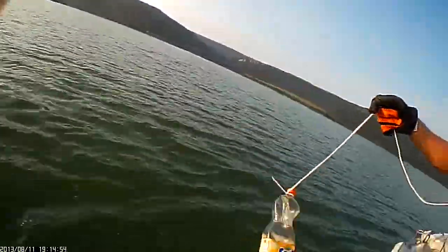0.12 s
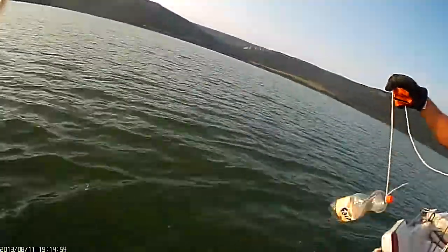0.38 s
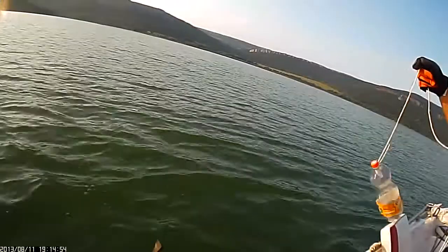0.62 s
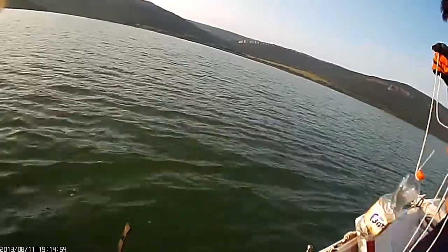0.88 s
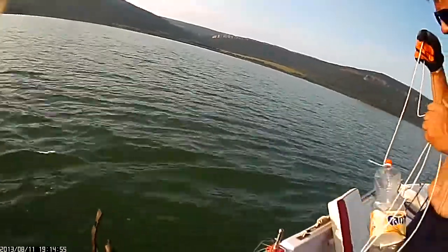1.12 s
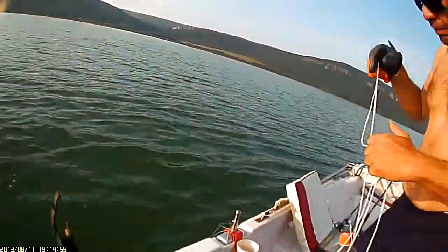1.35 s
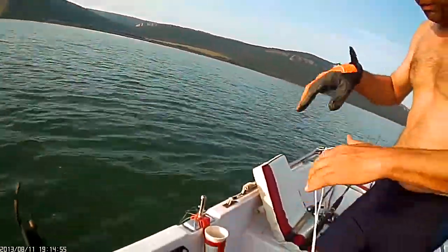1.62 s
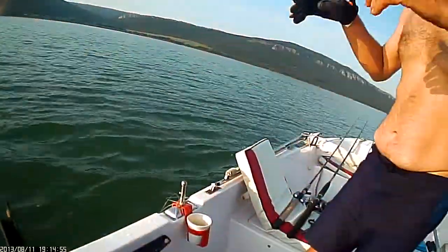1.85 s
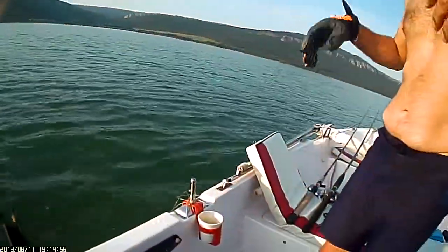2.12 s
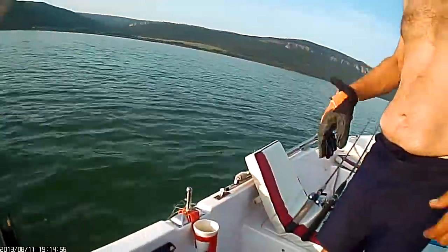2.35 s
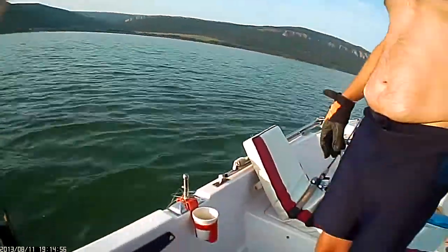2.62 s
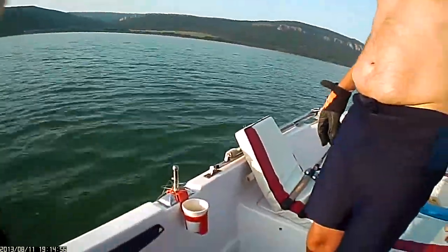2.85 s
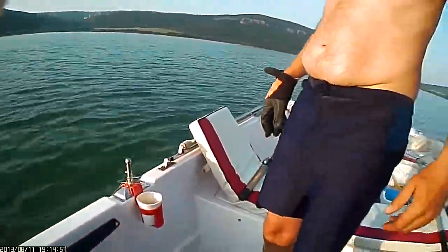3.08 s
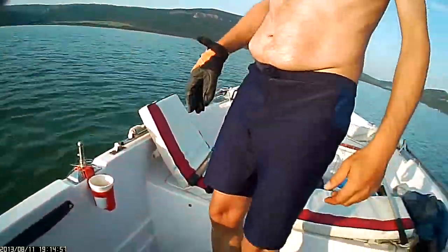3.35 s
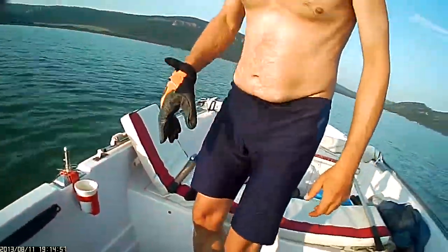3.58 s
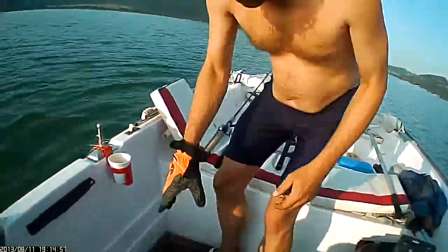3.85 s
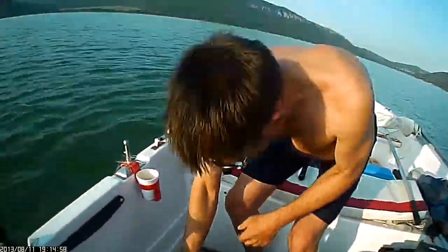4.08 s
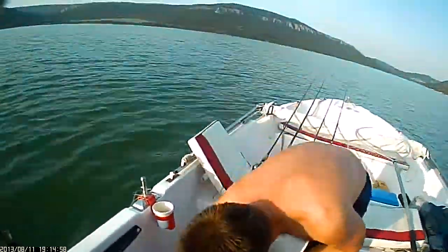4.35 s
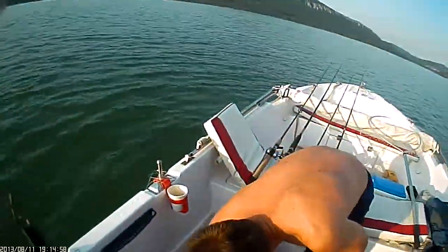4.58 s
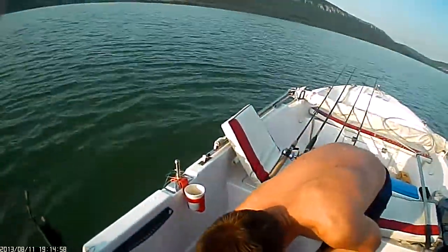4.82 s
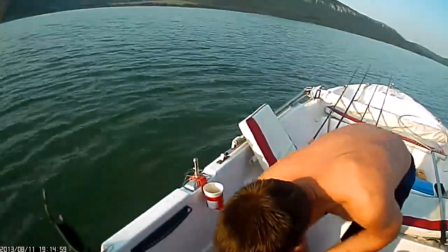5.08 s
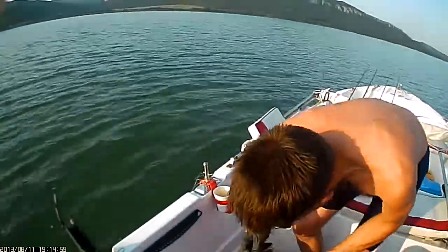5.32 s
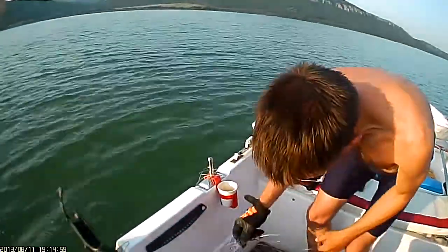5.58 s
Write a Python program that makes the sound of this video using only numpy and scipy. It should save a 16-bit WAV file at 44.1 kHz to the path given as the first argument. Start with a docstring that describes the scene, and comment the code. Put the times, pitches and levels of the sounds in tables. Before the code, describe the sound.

Muffled boat motor puffs steadily while a wet float is lifted, drops with a hollow bang, bounces, and gear knocks and scrapes.

```python
"""An idling outboard throbs and puffs once a turn on a lake, heard from inside a sealed plastic case.
A float comes dripping out of the water with gulps of air, drops on the deck and bounces; gear knocks and scrapes.
The throb is a sum of multiples of the turn rate, puffs and rattle are gated noise, and blows ring hull modes.
Narrow high rings and a loose metal fitting are noise-driven modes, gulps are short sliding tones.
Underneath, banded noise swells as wind, wash, handling rubs and spray, and the microphone hisses steadily."""
import sys
import numpy as np
from scipy import signal
from scipy.fft import rfft, irfft
from scipy.io import wavfile
from scipy.ndimage import uniform_filter1d

SR = 44100
rng = np.random.default_rng(int(sys.argv[2]) if len(sys.argv) > 2 else 0)


def wrap_up_sound(samples):
    """Save the sound to the file named by the first command line argument, as 16-bit audio."""
    columns = np.atleast_2d(samples).T
    # keep every value between -1 and 1, then stretch to whole-number steps
    tamed = np.clip(columns, -1, 1)
    steps = np.round(tamed * 32767).astype(np.int16)
    wavfile.write(sys.argv[1], SR, steps)


def undo_db(level):
    """Turn decibels back into plain size, where 20 dB means ten times bigger."""
    steps = np.asarray(level, float) / 20
    return 10 ** steps


N = 251370
T = np.arange(N) / SR
RISE_S = 0.001247  # build-up of a contact

# What passes the sealed case: (frequency [Hz], level [dB])
CASE = [(20, 10), (500, 0.5), (680, 3.5), (800, -3.5), (1000, -14), (1300, -25.5), (1700, -21.5),
        (1900, -9), (2060, -1), (2200, -9.5), (2400, -17.5), (3000, -27), (3500, -37.5), (4000, -19.5),
        (4700, -25), (5900, -36), (6400, -34.5), (8000, -44), (16000, -49)]


def curves(table):
    """The columns of a table as sample-by-sample curves."""
    s, *columns = np.transpose(table)
    return [np.interp(T, s, c) for c in columns]


def colour(x, points):
    """Causal filter through (Hz, dB) points, built from the cepstrum of the log gain."""
    hz, db = np.transpose(points)
    size = 4096
    grid = np.arange(size // 2 + 1) * SR / size + 1
    log_gain = np.interp(np.log(grid), np.log(hz), db) * np.log(10) / 20
    cepstrum = irfft(log_gain)
    # fold the second half onto the first: minimum phase
    cepstrum[1:size // 2] *= 2
    cepstrum[size // 2 + 1:] = 0
    impulse = irfft(np.exp(rfft(cepstrum)))
    return signal.fftconvolve(x, impulse)[:len(x)]


def band(x, lo_hz, hi_hz):
    """Steep band-pass: the same filter twice."""
    sos = signal.butter(2, [lo_hz, hi_hz], "band", fs=SR, output="sos")
    return signal.sosfilt(np.vstack([sos, sos]), x)


def ring(x, hz, t60):
    """One decaying mode, driven by x; t60 in seconds."""
    pole = np.exp(2j * np.pi * hz / SR - np.log(1000) / (t60 * SR))
    return signal.lfilter([1], [1, -pole], x).imag


def unit(x):
    """Scale to rms 1."""
    return x / np.sqrt(np.mean(x ** 2))


def walk(rate):
    """Random levels held 1 / rate s and slewed twice; spread 1."""
    k = int(SR / rate)
    steps = np.repeat(rng.standard_normal(N // k + 1), k)
    smooth = uniform_filter1d(uniform_filter1d(steps, k), k)
    return unit(smooth[:N])


def add(out, s, sound, peak_db):
    """Mix a short sound in at time s with the given peak."""
    i = int(s * SR)
    scaled = undo_db(peak_db) * sound / np.abs(sound).max()
    out[i:i + len(sound)] += scaled[:N - i]


def swells(calm_db, events, gain_db=0, pace=1):
    """A calm level in dB with events on top; each climbs, holds from its time on and sinks."""
    climb_db_per_s, sink_db_per_s = 95, 87  # at pace 1
    power = undo_db(calm_db) ** 2
    for s, hold, db in events:
        climb = climb_db_per_s * np.maximum(s - T, 0)
        sink = sink_db_per_s * np.maximum(T - s - hold, 0)
        power = power + undo_db(db + gain_db - pace * (climb + sink)) ** 2
    return 10 * np.log10(power)


def motor():
    """Low multiples of the turn rate shake the hull; each turn gives an exhaust puff and, a little later, a rattle."""
    # Motor idle: (time [s], speed [turns per second])
    idle_speed = [(0.0, 17.74), (0.475, 17.93), (0.95, 17.76), (1.425, 18.04), (1.9, 18.39), (2.375, 17.72),
                  (2.85, 17.96), (3.325, 18.02), (3.8, 17.54), (4.275, 18.45), (4.75, 18.31),
                  (5.225, 17.96), (5.7, 18.05)]
    # Hull shake before the overall lift and fade: (multiple of the turn rate [-], level [dB rms])
    throb_partials = [(1, -37), (2, -41), (3, -51.5), (4, -52.5), (5, -56), (6, -58.5), (7, -55), (8, -62),
                      (9, -60.5), (11, -70), (13, -63)]
    # Motor effort: (time [s], exhaust puff level [dB])
    effort = [(0, -58), (.55, -52), (1.0, -53), (1.3, -55), (1.8, -49.5), (2.4, -55), (2.9, -49),
              (3.3, -51.5), (3.55, -54), (3.75, -43), (4, -55.5), (5.7, -56.5)]
    start_turn = 0.14
    turn = start_turn + np.cumsum(curves(idle_speed)[0]) / SR

    # lifted 1.5 dB, fading by 1.6 dB per second from 3.5 s on
    throb_db = 1.5 - 1.6 * np.maximum(T - 3.5, 0)
    throb = 0
    for k, db in throb_partials:
        # higher multiples come through the hull ever later in the turn and drift a little
        lag = (k - 1) * (0.38 + 1.22 * (k - 1) + 0.08 * walk(5))
        level = undo_db(db + (1.6 + 0.13 * k) * walk(15))
        throb = throb + level * np.sqrt(2) * np.cos(2 * np.pi * k * turn - lag)

    # each turn has its own strength: column 0 for the puff, column 1 for the rattle
    strength = undo_db(rng.standard_normal((200, 2)) * [1.5, 3.5])

    def gate(column, at, fade):
        """Sudden onset at one point of each turn, then a decay; at and fade in turns."""
        since = turn - at
        return strength[since.astype(int) + 1, column] * np.exp(-(since % 1) / fade)

    # a firm push of gas with some roughness
    burst = gate(0, 0.87, 0.044) * (9 + rng.standard_normal(N))
    gas = band(burst, 272, 1350)
    puff = colour(ring(gas, 633.0, 0.024) + 0.1 * ring(gas, 501, 0.17), CASE)

    rough = gate(1, 0.094, 0.36) * rng.standard_normal(N)
    rattle = colour(band(rough, 1830, 5600), CASE)
    return undo_db(throb_db) * throb + undo_db(curves(effort)[0]) * unit(puff) + undo_db(-63.5) * unit(rattle)


def knocks():
    """A short rough contact clicks and rings the hull; where it lands decides which modes answer."""
    # Blows on deck and hull: (time [s], click peak [dB], brightness against the click [dB],
    # thud peak [dB], pitch of the struck panel above panel_hz [octaves])
    blows = [(1.6105, -24, -16, -6, -0.3), (1.6174, -25, -12, -8, 1), (1.6207, -43, -19, -18, 0.77),
             (1.6235, -45, -45, -7, 0.98), (1.6307, -43, -24.5, -19, 0.11), (1.6432, -41, -14, -18, -1.7),
             (1.6688, -66, -12, -22.5, -0.57), (1.725, -42, -9, -33, -0.23), (1.8085, -33, -6, -20, 0.05),
             (1.8115, -39, 1, -30, 1.3), (1.8218, -34, -9, -30, -0.9), (1.8905, -35, -10, -19, -0.9),
             (1.8925, -51, -11, -25, 1.2), (1.926, -44, -6, -34, 0.1), (2.0335, -37, -8, -27, 0.8),
             (2.039, -32.5, -9, -18, 0.3), (2.0558, -53, -19, -32, 0.27), (2.206, -55, -19, -38, 0.7),
             (2.2343, -51, -19, -31, 0.3), (2.2692, -49, -8, -31, 0.45), (2.312, -52, -15, -33, 0.6),
             (2.397, -43, -22, -27, 0.1), (2.4349, -46, -20, -34, 0.24), (2.457, -47, -4, -31, 0.9),
             (2.498, -42, -21, -27, 0.2), (2.5424, -39, -17, -28.5, 0.97), (2.558, -51, -20, -33.5, -0.16),
             (2.921, -43.5, -8, -40, 0.31), (2.9603, -37.5, -17, -36.5, 1.33), (3.053, -46, -20, -56, 0.94),
             (3.0787, -27, -17, -23.5, 0.34), (3.088, -30, -20, -27, 0.12), (3.1006, -27, -13, -29, 1.24),
             (3.109, -32, -11, -28, -0.9), (3.1222, -24.5, -9, -22, 0.9), (3.126, -45, -1, -20, -0.05),
             (3.133, -31, -6, -25, -1.3), (3.145, -52, -5, -32, 0.16), (4.703, -42, -5, -52, -0.32),
             (4.808, -56, -9, -37, 0.8), (5.0, -43, -7, -53, 0.48), (5.119, -45, -5, -44, 1.1),
             (5.159, -45, -5, -41, 0.95), (5.245, -48.5, -2, -41, 0.99), (5.279, -41, -3, -36, 0.85),
             (5.2949, -44, -1, -47, -0.43)]
    # Hull modes: (frequency [Hz], level [dB], t60 [s])
    hull_modes = [(129, 3, 0.22), (195, 1, 0.2), (237, -0.5, 0.12), (301, -2, 0.073), (351, 2.5, 0.15),
                  (410, -1, 0.09), (478, -4, 0.1), (535.6, -12, 0.1), (611, -5.5, 0.06), (666, 3.5, 0.055),
                  (800, -8, 0.06), (870, -2, 0.06), (965, -4, 0.05), (1155, -6, 0.1)]
    contact_s, soft_s_per_db = 0.0058, 0.00018  # clicks softer than -25 dB last longer
    panel_hz, panel_db, panel_t60_s = 357, 4.5, 0.017  # the dull, short ring of the struck spot
    panel_fall_db = -14  # for modes one octave off the panel's pitch
    place_db = 2  # random spread of the modes from blow to blow
    slap_db, snap_db = -31, -11  # broad slap against the thud; topmost snap against the brightness
    scrape = 0.15

    out, t = np.zeros(N), T[:SR // 3]
    rough = rng.standard_normal((len(blows), len(t)))
    place = rng.standard_normal((len(blows), len(hull_modes)))
    for (s, click_db, bright_db, thud_db, octaves), noise, share in zip(blows, rough, place):
        contact = contact_s + soft_s_per_db * max(-25 - click_db, 0)
        rise = RISE_S * contact / contact_s
        push = noise * np.minimum(t / rise, 1) * np.exp(-t / contact)
        click = push[:SR // 10]
        start = s - RISE_S
        add(out, start, colour(band(click, 1550, 3200), CASE), click_db)
        add(out, start, colour(band(click, 1314, 1760), CASE), thud_db + slap_db)
        add(out, start, colour(band(click, 3000, 5800), CASE), click_db + bright_db)
        add(out, start, colour(band(click, 5800, 12000), CASE), click_db + bright_db + snap_db)

        # one firm push, then the scrape of the contact
        blow = np.exp(-(t - RISE_S) ** 2 / 0.00006 ** 2) + scrape * push
        thud = undo_db(panel_db) * ring(blow, panel_hz * 2 ** octaves, panel_t60_s)
        for k, ((hz, db, t60), spread) in enumerate(zip(hull_modes, share)):
            off_pitch = np.log2(hz / panel_hz) - octaves
            level = undo_db(db + place_db * spread + panel_fall_db * off_pitch ** 2)
            # neighbouring modes answer with opposite sign
            thud = thud + (-1) ** k * level * ring(blow, hz, t60)
        add(out, start, colour(band(thud, 45, 1300), CASE), thud_db)
    return out


def high_rings():
    """Held noise drives one narrow high mode: the ring of the knocks' clicks, and a few longer scrapes of gear."""
    # Click rings and scrapes: (time [s], hold [s], peak [dB], frequency [Hz])
    rings = [(1.611, 0.009, -21, 1880), (2.04, 0.0048, -26, 2146), (2.24, 0.018, -45, 2150),
             (2.432, 0.005, -35, 2140), (3.079, 0.007, -23, 2090), (4.208, .01, -43, 2090),
             (4.53, .08, -45.5, 2080), (4.703, .012, -40, 2040), (5.276, 0.007, -34, 2180),
             (5.29, 0.017, -37, 2150)]
    fade_s, t60_s = 0.0054, 0.014
    out, t = np.zeros(N), T[:SR // 4]
    rough = rng.standard_normal((len(rings), len(t)))
    for (s, hold, peak_db, hz), noise in zip(rings, rough):
        drive = np.minimum(t / RISE_S, 1) * np.exp(-np.maximum(t - hold, 0) / fade_s)
        once = ring(noise * drive, hz, t60_s)
        add(out, s, ring(once, hz, t60_s), peak_db)
    return out


def gulps():
    """Each gulp of air is a short tone that slides up as the bubble leaves."""
    # Air gulps in the float's neck: (time [s], peak [dB], frequency at the onset [Hz])
    bubbles = [(0.295, -40, 402), (0.33, -34, 552), (0.347, -24, 544), (0.366, -27, 585), (0.384, -35, 558),
               (0.438, -34, 432), (0.439, -30.5, 590), (0.447, -23.5, 594), (0.457, -25.5, 626),
               (0.469, -35, 540), (0.499, -34, 634), (5.291, -38, 603), (5.305, -36.5, 556),
               (5.317, -31.5, 587)]
    out, t = np.zeros(N), T[:SR // 8]
    for s, peak_db, hz in bubbles:
        # time scale 6.9 ms at -26.5 dB; softer gulps last longer, by 1 ms per dB
        scale_ms = max(6.9 - 1 * (peak_db + 26.5), 3)
        u = t * 1000 / scale_ms
        tone = np.sin(2 * np.pi * hz * t * (1 + 0.0084 * u))
        add(out, s, u * np.exp(-2 * u) * tone, peak_db)
    return out


def fitting():
    """A loose metal fitting, set off by the motor's shake: a short noisy tap rings one thin mode."""
    # Tinks of the fitting: (time [s], peak [dB])
    tinks = [(3.2904, -45), (3.3997, -46), (3.4545, -53), (3.5663, -51), (3.6775, -51), (3.906, -52.5),
             (3.9629, -44.5), (4.0736, -51.5), (4.1849, -44.5), (4.4034, -44.5), (4.5116, -51),
             (4.6214, -47), (4.8414, -48), (5.0584, -49.5), (5.5089, -47), (5.6161, -47.5)]
    out, t = np.zeros(N), T[:SR // 3]
    rough = rng.standard_normal((len(tinks), len(t)))
    for (s, peak_db), noise in zip(tinks, rough):
        tap = noise * t * np.exp(-t / 0.002)
        add(out, s, ring(tap, hz=1973, t60=0.16), peak_db)
    return out


def wind_and_water():
    """Wind and rubs on the case rumble, wash gurgles on the hull, spray hisses with scattered droplets."""
    # Wind gusts on the case: (time [s], hold [s], level [dB])
    gusts = [(3.636, 0.38, -39), (4.656, 0.15, -47), (5.29, 0.056, -46)]
    # Low rumbling wash swells, water on the hull early, handling rubs on the case later:
    # (time [s], hold [s], level [dB])
    low_swells = [(0.15, 0.09, -45.5), (0.31, 0.033, -41.5), (0.33, 0.14, -42.5), (1.807, .04, -49),
                  (2.24, 0.05, -45.5), (2.407, 0.026, -45.5), (2.504, 0.068, -50.5), (3.698, 0.3, -54),
                  (5.594, .1, -50.5)]
    # Spray thrown up: (time [s], hold [s], level [dB])
    sprays = [(.11, 0.08, -54.5), (0.243, 0.02, -53.5), (.32, 0.31, -56), (1.796, 0.23, -66),
              (2.362, 0.22, -61.5), (4.682, 0.082, -57.5), (5.255, 0.017, -54)]
    # Water streaming off the lifted float: (time [s], hold [s], level [dB])
    streams = [(0.19, 0.063, -55), (0.632, 0.43, -55.5)]
    # A narrow whistling hiss as the float leaves the water: (time [s], hold [s], level [dB])
    whistles = [(0.138, 0.056, -47)]

    # the low swells rumble too, 3 dB down, in the band of the wind
    wind_db = swells(swells(-50.5, gusts, pace=1.6), low_swells, gain_db=-3)
    wind = band(rng.standard_normal(N), 34, 244) * undo_db(0.92 * walk(18))
    wash = band(rng.standard_normal(N), 246, 1250) * undo_db(1.0 * walk(30))
    # about 500 droplets per second
    drops = (rng.random(N) < 500 / SR) * rng.standard_normal(N) * 6
    spray = band(rng.standard_normal(N) + drops, 1350, 6200) * undo_db(1.7 * walk(25.11))
    stream = band(rng.standard_normal(N) + drops, 1310, 1870)
    buffet = band(rng.standard_normal(N), 5.9, 36.7)
    whistle = ring(rng.standard_normal(N), hz=2060, t60=0.036)
    layers = [(wind, wind_db),
              (wash, swells(-51.5, low_swells)),
              (spray, swells(-66, sprays, pace=1.4)),
              (stream, swells(-94, streams)),
              (buffet, -41.5 - 0.79 * T),
              (whistle, swells(-90, whistles, pace=2.5))]
    return sum(undo_db(db) * unit(colour(x, CASE)) for x, db in layers)


def scene():
    """Everything as it reaches the inside of the case."""
    return (motor() + knocks() + high_rings() + gulps() + fitting() + wind_and_water())[None]


def roll_off(x):
    """The treble ends steeply here."""
    return signal.sosfilt(signal.butter(12, 15810, fs=SR, output="sos"), x)


def record(dry):
    """The microphone adds its own steady hiss."""
    # Colour of the hiss: (frequency [Hz], relative density [dB per Hz])
    hiss_colour = [(100, 15), (900, 3.5), (1500, 7), (3000, 2), (5000, 1), (8000, -0.5), (14000, -1),
                   (16000, -7)]
    hiss = undo_db(-58.5) * unit(colour(rng.standard_normal(N), hiss_colour))
    return roll_off(dry + hiss)


dry = scene()
out = record(dry)
wrap_up_sound(out)
```